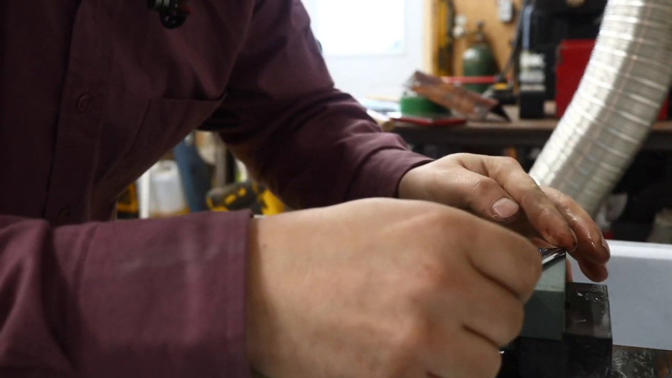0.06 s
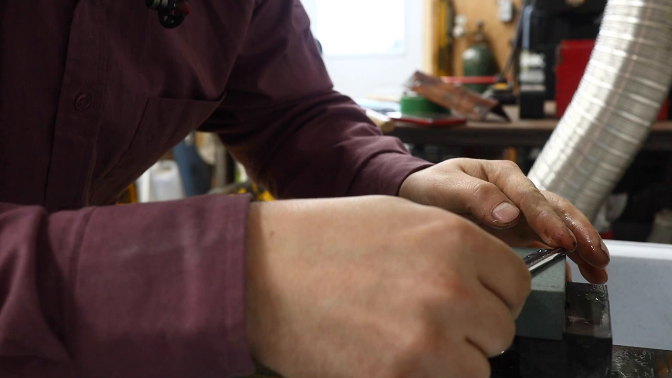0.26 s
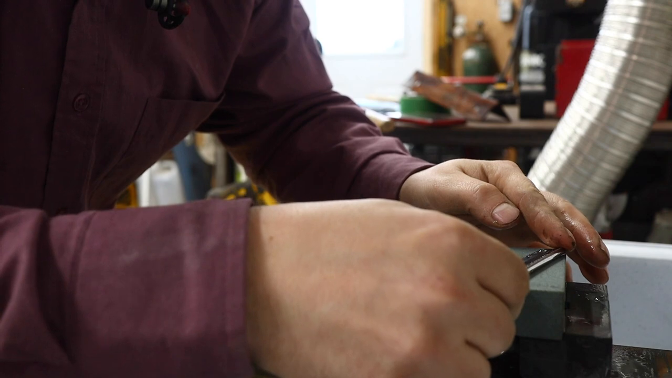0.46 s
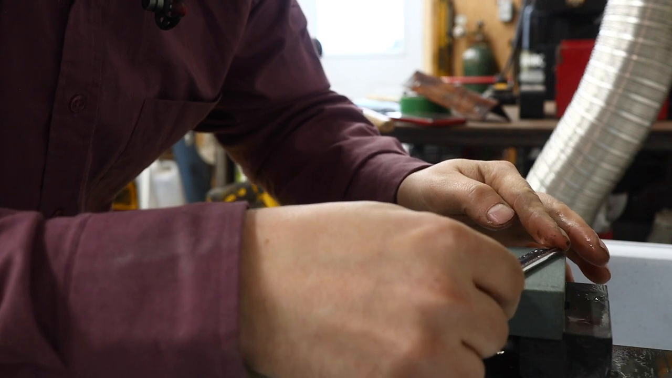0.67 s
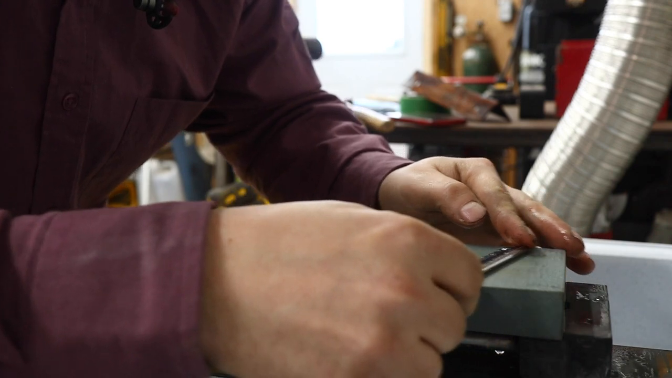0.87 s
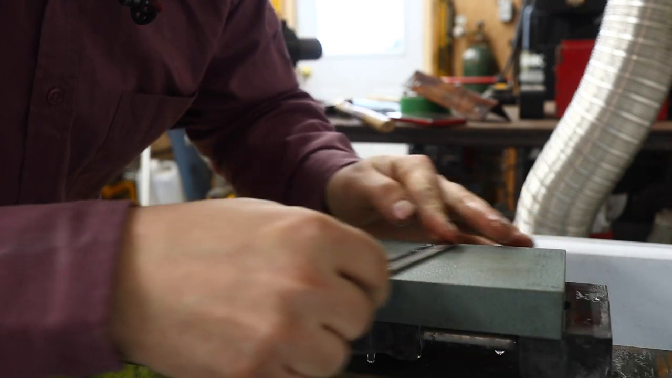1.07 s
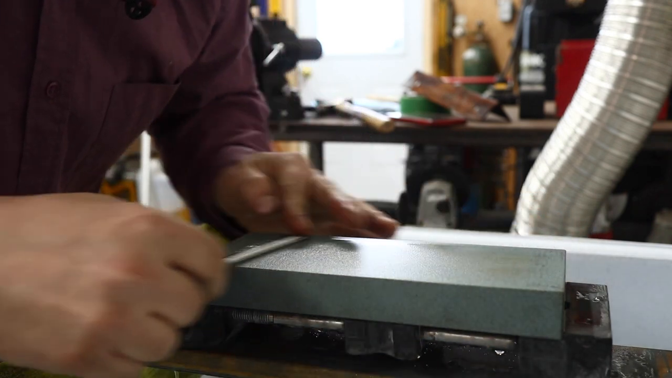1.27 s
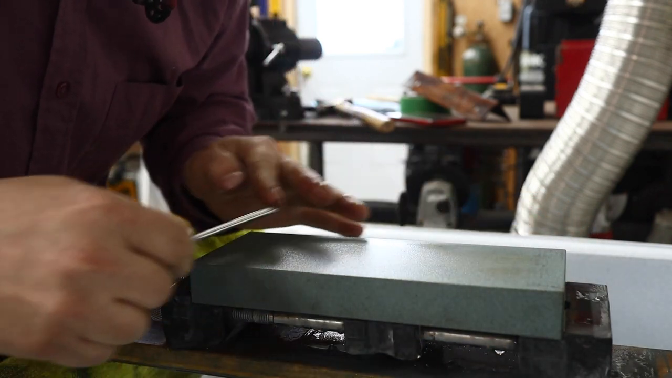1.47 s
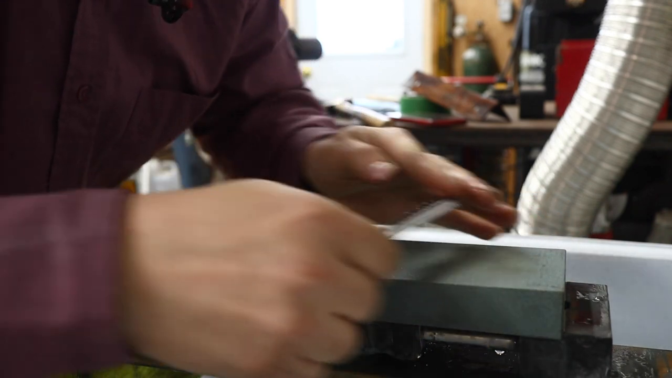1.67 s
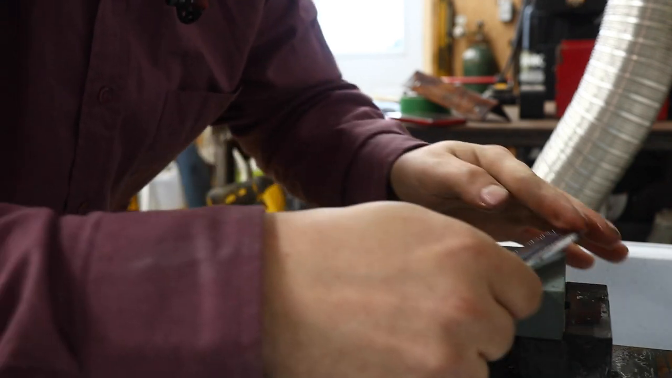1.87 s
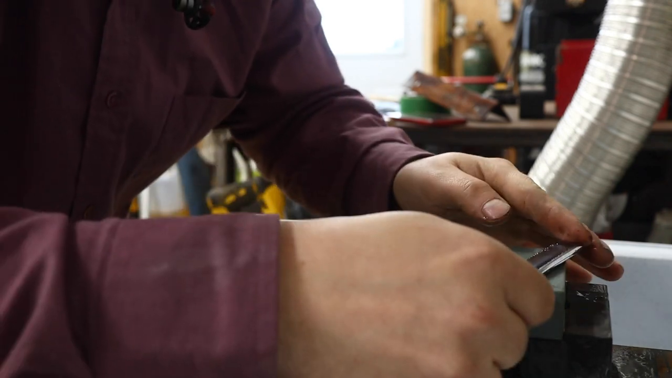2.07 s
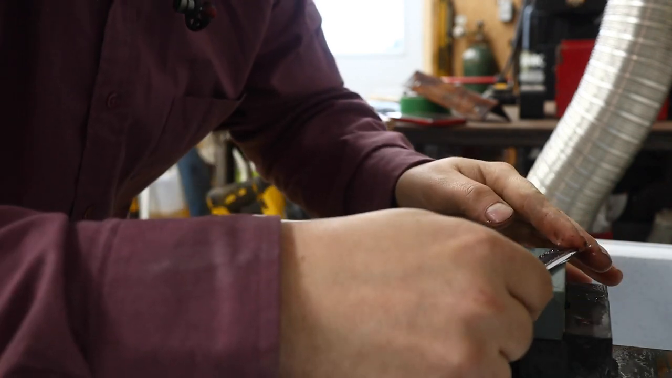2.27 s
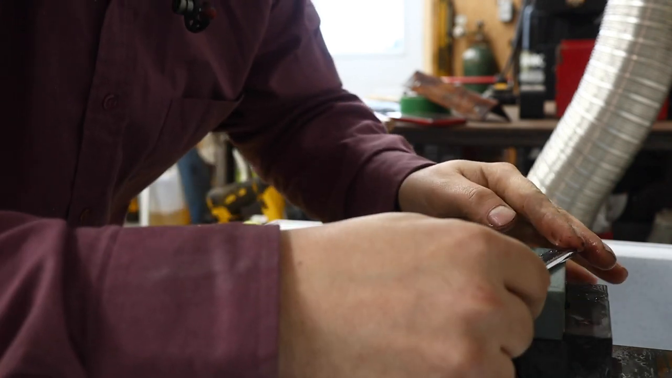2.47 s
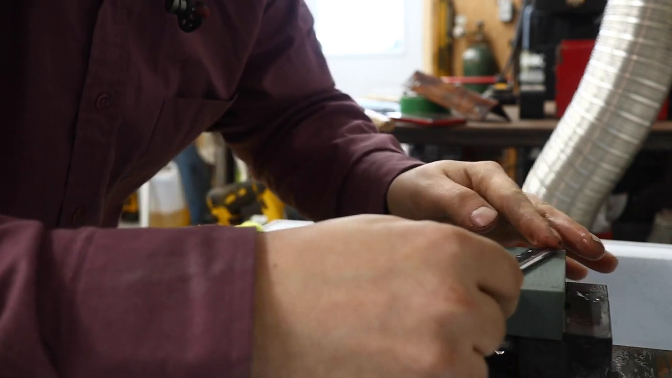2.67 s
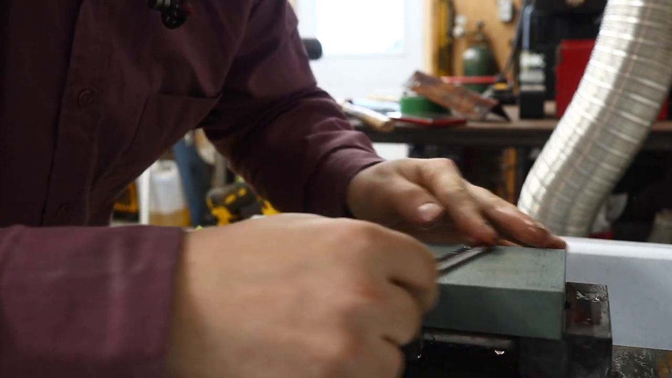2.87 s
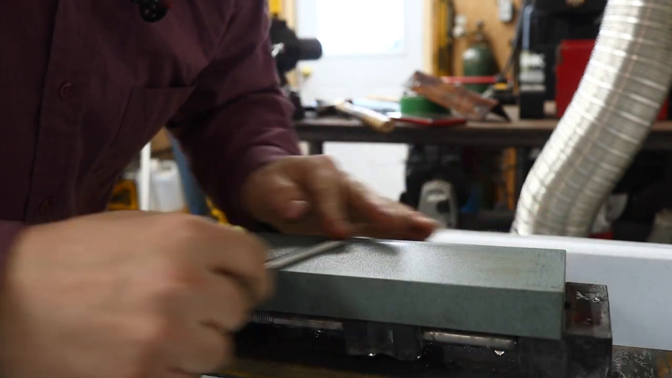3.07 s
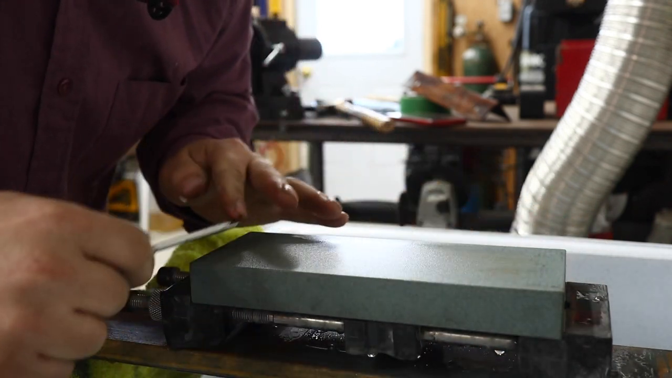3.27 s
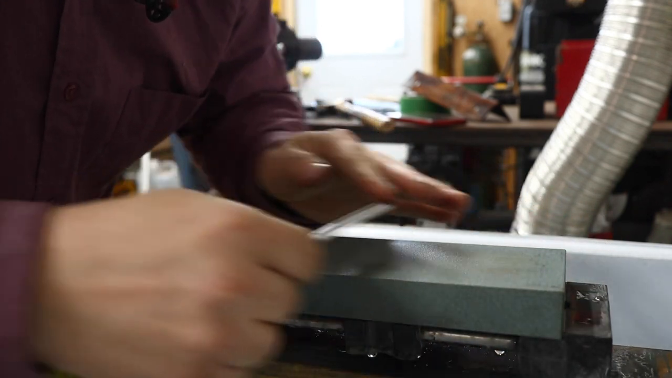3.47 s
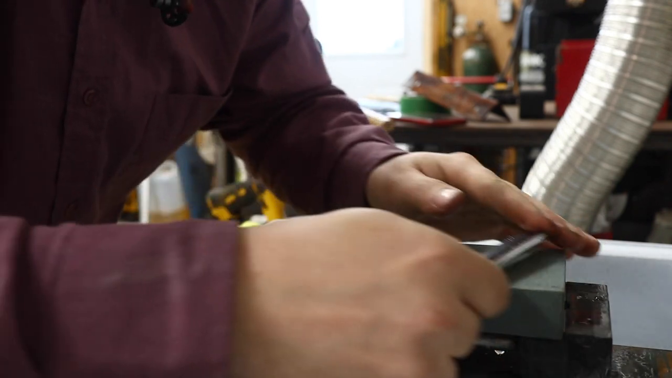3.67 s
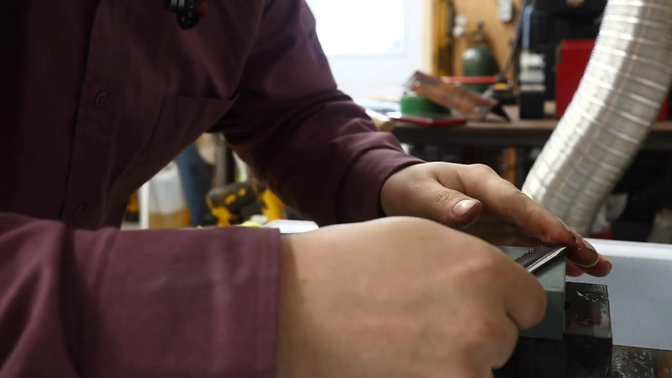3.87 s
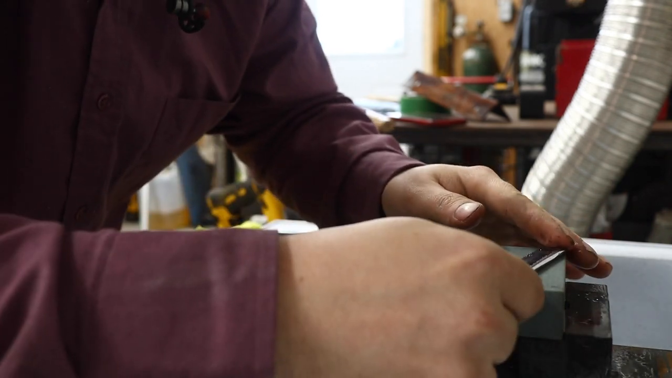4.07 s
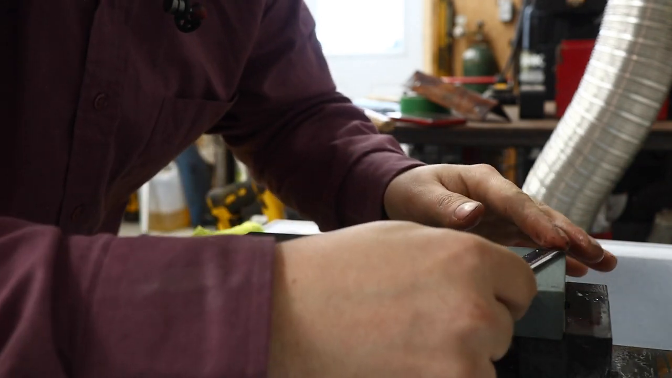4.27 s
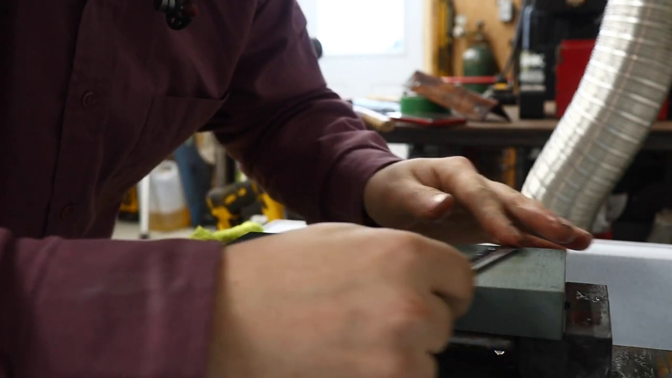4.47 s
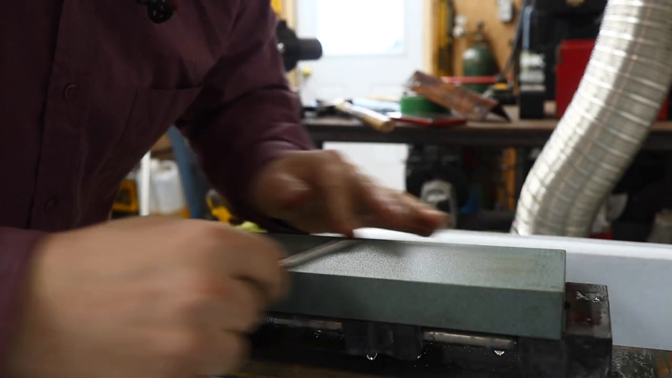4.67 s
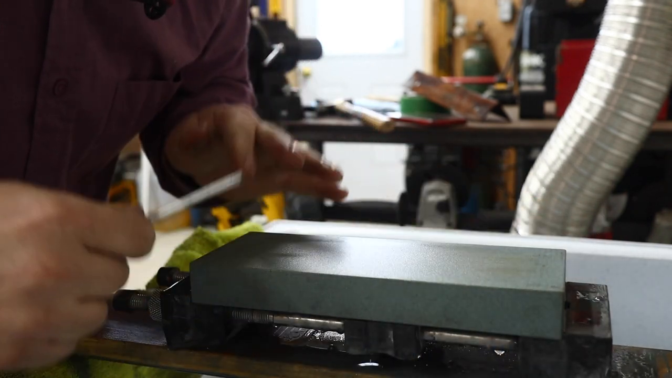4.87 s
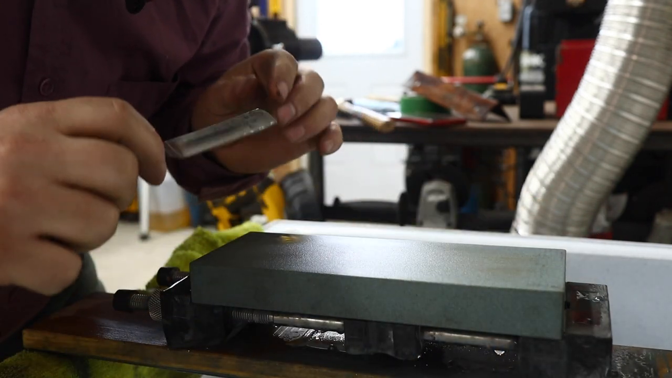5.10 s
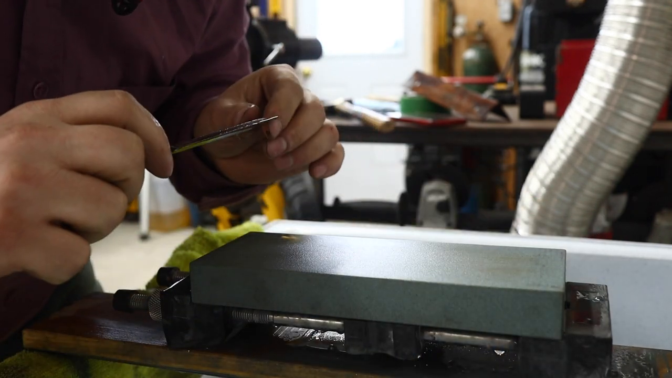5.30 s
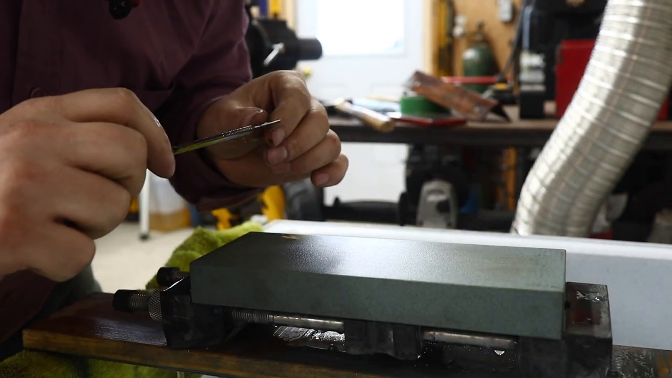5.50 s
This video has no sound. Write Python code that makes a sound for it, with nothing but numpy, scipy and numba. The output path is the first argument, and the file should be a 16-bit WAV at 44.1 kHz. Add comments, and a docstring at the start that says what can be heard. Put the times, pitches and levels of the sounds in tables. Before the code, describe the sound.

In a small, lightly reverberant workshop, a blade taps a sharpening stone and is drawn along it in three strokes. Each begins slow and grainy with tiny cracks, accelerates to a dense steely scrape with short zings, and lifts off cleanly. Dull finger knocks and light scuffs fill the pauses over faint fan air. The microphone is close, with wide stereo and movement across the stone.

```python
"""Straight razor on a whetstone

Three strokes: a blade lands with a clack, settles with gritty ticks, then is drawn slowly and fast along a
coarse stone, close up in a small workshop. Random grains excite blade and stone resonances; noise and short
bursts shake the bench through low resonances. Handle knocks are filtered bursts, the fan is wavering tones
over air noise, and decaying noise tails supply the near reflections and the room.
"""
import sys
import numpy as np
from scipy import signal
from scipy.fft import rfft, irfft
from scipy.io import wavfile
from scipy.ndimage import map_coordinates
from numba import njit

SR = 44100
rng = np.random.default_rng(int(sys.argv[2]) if len(sys.argv) > 2 else 0)


def transcribe(signal):
    """Save signal, clipped to [-1, 1], as a 16-bit WAV file at the path in sys.argv[1]."""
    frames = np.atleast_2d(signal).T
    limited = np.clip(frames, -1, 1)
    pcm = np.round(limited * 32767).astype(np.int16)
    wavfile.write(sys.argv[1], SR, pcm)


N = 244314
TIME = np.arange(N) / SR

# Event levels are drive levels: each layer adds its own trim on top.
# strokes: blade starts [t/s], fastest [t/s], starts to leave [t/s], time to bear down [t/s],
# fast pull from peak to 1/e [t/s], slow creep re peak [level/dB], first bite re rasp [level/dB],
# rasp [level/dB], edge hiss [level/dB], blade resonance in the fast pull before tip rise and wander [f/Hz]
STROKES = [(0.738, 1.23, 1.443, 0.01, .2, -16, -20, -18.8, -26.6, 2520),
           (2.59, 3.125, 3.305, 0.013, .16, -17.5, -16, -17.7, -25.5, 2830),
           (4.33, 4.755, 4.89, 0.029, .142, -18.5, -24, -15.8, -22.7, 2900)]
# how hard the resting, then dragging blade shakes the bench, one list per stroke: [t/s, level/dB]
BENCH_LOADS = [
    [(0.64, -50), (0.68, -32.5), (0.91, -26.5), (0.945, -25.5), (1.11, -24), (1.28, -27), (1.33, -32.5),
     (1.385, -28.5), (1.45, -38)],
    [(2.09, -42), (2.20, -53), (2.56, -47.5), (2.60, -23), (2.655, -24.5), (2.70, -29.5), (2.92, -26.5),
     (3.14, -29), (3.255, -31), (3.29, -66)],
    [(3.92, -39), (4.11, -66), (4.32, -37.5), (4.39, -26.5), (4.50, -30.5), (4.545, -25.5), (4.64, -25.5),
     (4.70, -34.5), (4.865, -29), (4.90, -44)],
]
# the edge chatters on one blade mode: centre [t/s], centre to 1/e [t/s], pitch [f/Hz], [level/dB]
CHATTER = [(1.08, 0.06, 6450, -35), (1.207, 0.038, 2300, -29.5), (1.233, 0.066, 4470, -21),
           (1.312, 0.02, 3180, -33), (1.391, 0.033, 4600, -29.5), (3.042, 0.04, 2440, -26),
           (3.128, 0.018, 3070, -20), (4.676, 0.031, 2600, -25), (4.817, 0.033, 7300, -31.5)]
# the blade lands on the stone: [t/s], then clack, treble, bench thump, bench rocking,
# blade body and free ring [level/dB each]
TAPS = [(0.0149, -30, -43, -28, -49.5, -28.5, -25), (0.641, -29, -42, -41, -37, -21.5, -61),
        (2.075, -29.5, -40, -32, -48.5, -32.5, -77), (2.585, -33, -39, -66, -54, -34.5, -38.5),
        (3.906, -22.5, -35.5, -36, -43.5, -25, -70), (4.327, -34, -43, -41, -38.5, -32.5, -44)]
# the edge catches large grains: [t/s], edge crack [level/dB], blade ring [level/dB]
TICKS = [(0.389, -26, -28.5), (0.6935, -45, -19), (0.7042, -45, -21.5), (0.773, -48, -17),
         (0.837, -28, -39), (0.989, -24, -53), (1.089, -33, -7), (1.118, -37, -21), (2.261, -40, -36),
         (2.3067, -40, -28), (2.409, -25.5, -31), (2.426, -27.5, -31.5), (2.664, -26, -20),
         (2.756, -40, -14.5), (2.802, -17.5, -26), (2.885, -47, -13), (2.985, -41, -5.5), (3.153, -15, -6),
         (3.297, -25, -47), (4.235, -32, -30), (4.2483, -33, -27.5), (4.351, -32, -18), (4.508, -37, -13)]
# the handle turns in the fingers: [t/s], bump [level/dB], hollow tock [level/dB]
KNOCKS = [(0.333, -46.5, -65), (0.534, -42, -44), (1.616, -43.5, -33), (1.751, -68, -39.5),
          (2.236, -42.5, -53), (3.54, -41.5, -50), (4.009, -53, -31.5)]
# the edge is nudged flat with a short scuff: start [t/s], end [t/s], [level/dB]
NUDGES = [(0.32, 0.349, -52), (0.636, 0.71, -48.5), (2.224, 2.238, -46), (2.297, 2.34, -49),
          (4.125, 4.156, -53), (4.186, 4.214, -56), (4.212, 4.252, -49.5)]

# relative spectra, rescaled to unit power by colour(): [f/Hz, level/dB]
RASP_SPECTRUM = [(300, -19), (700, -35), (1250, -21.5), (1600, -7), (2000, -2), (3000, 2.5), (3700, -1.5),
                 (4400, -5), (5800, -7.5), (8500, -8), (15000, -28.5)]
EDGE_SPECTRUM = [(1500, 0.5), (4000, -26), (6000, 5.5), (8000, 1.5), (9400, 2), (10700, 6), (12000, 3.5),
                 (14000, -9), (16000, -37)]
STONE_SPECTRUM = [(100, -30), (250, 5), (430, 1), (600, -8), (780, -10), (950, -2), (1250, -9.5), (1550, 1),
                  (2200, -19.5), (4000, -41)]
BENCH_SPECTRUM = [(20, -51), (45, -16), (70, -9), (120, -5), (190, -4.5), (240, -11), (350, -28),
                  (600, -24), (1500, -83)]
BITE_SPECTRUM = [(500, -8), (2200, -5.5), (3200, 5), (4700, 1.5), (5600, -17), (9400, -6), (10800, -6.5),
                 (15000, -48)]
TAP_SPECTRUM = [(100, -25), (600, -10.5), (1000, -3.5), (1400, 1.5), (2400, -3.5), (3300, -3.5),
                (4500, -10), (6500, -47), (9000, -6), (15000, -56)]
TAP_BODY_SPECTRUM = [(500, -9), (2000, -26), (2550, 2), (3500, -2.5), (4100, -6), (7000, -27), (13000, -44)]
TOCK_SPECTRUM = [(200, -13), (600, -7), (880, -4.5), (1400, -7), (3300, -35), (8000, -42)]
KNOCK_SPECTRUM = [(40, -26), (130, 6), (400, 0), (700, -11.5), (1000, -11), (2000, -19), (5000, -64)]
ROCK_SPECTRUM = [(25, -41), (55, 23), (75, 18.5), (120, 10.5), (300, -9), (1000, -64)]
AIR_SPECTRUM = [(15, -70), (25, -7.5), (193, -8.5), (209, 1.5), (313, -5.5), (445, -3.5), (582, -8),
                (1200, -11.5), (1950, -13.5), (4040, -21.5), (12500, -36.5), (15500, -64)]
# resonances on those spectra: centre [f/Hz], width [f/Hz], lift [level/dB]
BLADE_MODES = [(2830, 220, 3), (3260, 160, 2), (4160, 200, 2), (4600, 400, 3), (6750, 200, 2),
               (10800, 600, 3)]
STONE_MODES = [(260.5, 18, 9.1), (314, 50, 4.5), (415.6, 27, 6.7), (1085, 28, 9.4)]
CLACK_MODES = [(920, 100, 7.3), (3370, 200, 14.7), (4860, 160, 6.9)]
BENCH_MODES = [(86, 34, 9.4), (146.1, 31.5, 13.9), (183.4, 26, 9.9)]
# the blade's free ring after a landing: [f/Hz], [level/dB], 60 dB decay [t/s]
FREE_RING = [(4540, -2, 0.025), (5750, 8.5, 0.011), (5920, 3, 0.027), (6530, -25, 0.21), (6350, -9, 0.052),
             (7000, -9, 0.06)]
# fan tones before the core and skirt trims: [f/Hz, level/dB]
FAN_TONES = [(220.7, -62), (269.2, -62), (312.2, -58.5), (1168, -64), (1690, -62), (1873, -67)]
# stereo width, as gain on the side channel: [f/Hz, level/dB]
SIDE_GAIN = [(60, -42), (140, -20.5), (250, -10.5), (500, -2), (1000, -0.5), (2200, 3), (4500, 5.5),
             (8000, 7.5), (12000, 10.5)]

AIR_DB = -50
BOUNCE_S, BOUNCE_DB = 0.008, -19  # the landing blade touches a second time
ROOM_DB, ROOM_T60_S, ROOM_TREBLE_T60_S, ROOM_SPLIT_HZ = -13, 0.52, 0.33, 6100
NUDGE_GRAINS_PER_S, NUDGE_BLADE_DB, NUDGE_UNEVEN_DB = 2000, 3, 6.5
EASE_S, LEAVE_S = 0.068, 0.016  # the hand eases off before the edge has left the stone
PULL_SQUARENESS = 2.6  # above 2, the fast pull sets in more suddenly and holds its speed
SURGE_DB, SURGE_PER_S = 1.0, 22  # the creeping blade catches and slips
BITE_S = 0.11  # the edge first digs in with a bright crunch, then settles
HISS_SPEED_POWER, HISS_TIP_DB = 0.94, 6  # edge hiss grows with speed and toward the tip
# the blade resonance rises toward the tip and wanders as the edge rocks
RING_SLOW_HZ, RING_TIP_HZ, RING_WANDER_HZ = 2810, 200, 25.8
RING_WIDTH_HZ, RING_BLUR_HZ = 210, 560  # resonator width at rest, and the extra at full speed
FLEX_HZ, FLEX_WANDER_HZ, FLEX_DB = 4250, 280, -12.5  # upper resonance of the thin edge
# base grain rate at a standstill, and the extra at full speed
GRAINS_SLOW_PER_S, GRAINS_FAST_PER_S = 1200, 40000
TOP_HZ = 15900


def undb(db):
    """Decibels to gain."""
    return 10 ** (np.asarray(db) / 20)


def unit(x):
    """Scale to rms 1."""
    return x / np.sqrt(np.mean(x ** 2))


def spectrum_db(hz, points):
    """Join (Hz, dB) points on a log-frequency axis."""
    at, db = np.transpose(points)
    return np.interp(np.log(hz + 1), np.log(at), db)


def colour(x, points, modes=(), size=8192):
    """Causal filter of unit power gain: a smooth spectrum lifted at resonances."""
    hz = np.fft.rfftfreq(size, 1 / SR)
    lifts = sum(lift / (1 + (2 * (hz - f) / width) ** 2) for f, width, lift in modes)
    db = spectrum_db(hz, points) + lifts
    # folding the cepstrum forward in time gives minimum phase, so onsets stay sharp
    cepstrum = irfft(np.log(undb(db)))
    cepstrum[1:size // 2] *= 2
    cepstrum[size // 2 + 1:] = 0
    response = irfft(np.exp(rfft(cepstrum)))
    return signal.fftconvolve(x, response / np.linalg.norm(response))[:N]


@njit
def resonate(x, hz, width):
    """State-variable band-pass whose centre and width move."""
    y, band, low = np.empty(len(x)), 0., 0.
    for i in range(len(x)):
        g, k = np.tan(np.pi * hz[i] / SR), width[i] / hz[i]
        v = (band + g * (x[i] - low)) / (1 + g * (g + k))
        band, low, y[i] = 2 * v - band, low + 2 * g * v, k * v
    return y


def resonate_twice(x, hz, width):
    """Two equal resonators in a row, for steeper skirts, scaled to rms 1."""
    return unit(resonate(resonate(x, hz, width), hz, width))


def walk(rate):
    """Smooth chance that changes about rate times a second; spread near 1."""
    steps = rng.standard_normal(4096)
    return map_coordinates(steps, [TIME * rate], order=2, mode="wrap")


def narrow(hz, width):
    """A wavering tone of rms 1: noise through a narrow resonator."""
    return unit(resonate(rng.standard_normal(N), np.full(N, float(hz)), np.full(N, float(width))))


def grit(rate, spread_db):
    """Grains break at rate a second, at most one a sample, most small and a few large."""
    size = undb(spread_db * np.minimum(rng.exponential(size=N), 5))
    hit = rng.random(N) < rate / SR
    sign = rng.choice([-1, 1], N)
    return unit(hit * size * sign / np.sqrt(rate))


def bursts(times, db, fade_s):
    """A short crush of random-sign pulses at each time, dying away."""
    envelope = np.zeros(N)
    for s, gain in zip(times, undb(db)):
        start = max(int(s * SR), 0)
        envelope[start:] += gain * np.exp(-TIME[:N - start] / fade_s)
    return envelope * rng.choice([-1, 1], N)


def ramp(seconds, length_s):
    """Rise from 0 to 1 over length_s once seconds turns positive."""
    return np.clip(seconds / length_s, 0, 1)


def echoes(x, delay_s, t60_s):
    """Diffuse reflections of unit energy: a decaying noise tail each for mid and side."""
    t = TIME[:SR]
    tail = rng.standard_normal((2, SR)) * np.exp(-np.log(1000) * t / t60_s) * (t > delay_s)
    tail /= np.linalg.norm(tail, axis=1, keepdims=True)
    return signal.fftconvolve(x[None], tail, axes=1)[:, :N]


def workshop():
    """Gently drifting air noise and the wavering tones of a fan, as mid and side."""
    def one_channel():
        air = undb(AIR_DB) * colour(rng.standard_normal(N), AIR_SPECTRUM) * undb(0.5 * walk(2.04))
        # each tone has a core of even level and wandering phase in a narrow skirt of turbulence
        cores = sum(undb(db) * np.sin(2 * np.pi * hz * TIME + 2.1 * walk(9.2)) for hz, db in FAN_TONES)
        skirts = sum(undb(db) * narrow(hz, width=16.0) for hz, db in FAN_TONES)
        return air + undb(1.5) * cores + undb(-3.5) * skirts
    return np.array([one_channel(), one_channel()])


def taps():
    """Steel lands on stone with a clack, bounces once, skids a little, and the blade rings freely."""
    s, peak_db, treble_db, _, _, body_db, ring_db = np.transpose(TAPS)
    strike = bursts(s, peak_db, fade_s=0.0028)
    bounce = bursts(s + BOUNCE_S, peak_db + BOUNCE_DB, fade_s=0.0016)
    skid = undb(-8.5) * bursts(s, peak_db, fade_s=0.021)
    clack = colour(strike + bounce + skid, TAP_SPECTRUM, CLACK_MODES)
    treble = colour(bursts(s, treble_db, fade_s=0.012), EDGE_SPECTRUM, [(10100, 1300, 14.0)])
    body = colour(bursts(s, body_db, fade_s=0.0043), TAP_BODY_SPECTRUM)
    blows = np.zeros(N)
    blows[(s * SR).astype(int)] = undb(ring_db)
    ring = sum(undb(db - 60 * TIME / t60) * np.sin(2 * np.pi * hz * TIME) for hz, db, t60 in FREE_RING)
    return clack + treble + body + signal.fftconvolve(blows, ring)[:N]


def bench(rumble):
    """The drag and each landing shake the stone, its clamp and the bench, which rocks on for a moment."""
    s, _, _, thump_db, rock_db, *_ = np.transpose(TAPS)
    drag = undb(-1.5) * rumble * rng.standard_normal(N)
    thump = undb(1.0) * bursts(s, thump_db, fade_s=0.021)
    rocking = colour(bursts(s, rock_db, fade_s=0.29), ROCK_SPECTRUM)
    return colour(drag + thump, BENCH_SPECTRUM, BENCH_MODES) + rocking


def near_echoes(x, place, count=13):
    """Stone, hands and clamp reflect differently at each place, so the colour shifts along a stroke."""
    # such small surfaces only throw back short waves
    x = signal.sosfilt(signal.butter(1, 600, "high", fs=SR, output="sos"), x)
    out = 0
    for k in range(count):
        # crossfade between neighbouring reflection patterns at equal power
        share = np.clip(1 - np.abs(np.sqrt(place) * (count - 1) - k), 0, 1)
        out = out + echoes(x * np.sqrt(share), delay_s=0.00019, t60_s=0.029)
    return out


def walls(x):
    """The small room rings briefly, its treble dying first."""
    low = signal.sosfiltfilt(signal.butter(2, ROOM_SPLIT_HZ, fs=SR, output="sos"), x)
    low_tail = echoes(low, delay_s=0.0046, t60_s=ROOM_T60_S)
    treble_tail = echoes(x - low, delay_s=0.0089, t60_s=ROOM_TREBLE_T60_S)
    return undb(ROOM_DB) * (low_tail + treble_tail)


def nudges():
    """Fine grains scuff unevenly while the edge is laid flat."""
    gain = sum(undb(db) * ramp(TIME - start, 0.0071) * ramp(end - TIME, 0.021) for start, end, db in NUDGES)
    uneven = undb(NUDGE_UNEVEN_DB * walk(50))
    crumbs = gain * uneven * grit(NUDGE_GRAINS_PER_S, spread_db=4.5)
    blade = undb(NUDGE_BLADE_DB) * colour(crumbs, RASP_SPECTRUM, BLADE_MODES)
    return colour(crumbs, EDGE_SPECTRUM) + blade


def knocks():
    """The handle bumps dully against the fingers, at times with a short hollow tock."""
    s, bump_db, tock_db = np.transpose(KNOCKS)
    bump = bursts(s, bump_db, fade_s=0.061) + undb(6.0) * bursts(s, bump_db, fade_s=0.011)
    tock = bursts(s, tock_db, fade_s=0.0014)
    return colour(bump, KNOCK_SPECTRUM) + colour(tock, TOCK_SPECTRUM)


def ticks():
    """Single grains crack under the edge, which then slips over the crumbs."""
    s, edge_db, blade_db = np.transpose(TICKS)
    crumbs = grit(5000, spread_db=3)
    blade_hit = undb(-7.0) * bursts(s, blade_db, fade_s=0.0015)
    blade_slip = undb(-19.0) * crumbs * bursts(s, blade_db, fade_s=0.013)
    crack = undb(-4) * bursts(s, edge_db, fade_s=0.002)
    slip = undb(-22.5) * crumbs * bursts(s, edge_db, fade_s=0.022)
    blade = colour(blade_hit + blade_slip, RASP_SPECTRUM, BLADE_MODES)
    return blade + colour(crack + slip, EDGE_SPECTRUM, [(11500, 10000, 8.2)])


def hand():
    """Each stroke bites, creeps, swells into a fast pull and lifts; speed, pressure and place set the drive."""
    rasp, bite, edge, rumble, place = np.zeros((5, N))
    ring_hz = np.full(N, float(RING_SLOW_HZ))
    surge_db = SURGE_DB * walk(SURGE_PER_S)
    for stroke, load in zip(STROKES, BENCH_LOADS):
        start, fastest, lift, bear_s, pull_s, creep_db, bite_db, rasp_db, edge_db, fast_hz = stroke
        pull = np.exp(-np.abs((TIME - fastest) / pull_s) ** PULL_SQUARENESS)
        speed = pull + (1 - pull) * undb(creep_db + surge_db)
        left_s = lift + LEAVE_S - TIME
        contact = ramp(TIME - start, bear_s) * ramp(left_s, LEAVE_S)
        pressure = ramp(left_s, EASE_S)
        # place on the stone: 0 at the far end, 1 where the blade lifts; the contact reaches the tip last
        along = np.cumsum(speed * contact) / np.sum(speed * contact)
        tip = along ** 4
        rasp += contact * pressure * speed * undb(rasp_db)
        bite += contact * np.exp(-((TIME - start) / BITE_S) ** 2) * undb(rasp_db + bite_db)
        edge += contact * speed ** HISS_SPEED_POWER * undb(edge_db + HISS_TIP_DB * tip)
        rumble += undb(np.interp(TIME, *np.transpose(load), left=-np.inf, right=-np.inf))
        place = np.where(contact > 0, along, place)
        stroke_hz = RING_SLOW_HZ + (fast_hz - RING_SLOW_HZ) * pull + RING_TIP_HZ * tip
        ring_hz = np.where(TIME > start, stroke_hz, ring_hz)
    return rasp, bite, edge, rumble, place, ring_hz + RING_WANDER_HZ * walk(25)


def scrape(rasp, bite, edge, rumble, ring_hz):
    """The edge ploughs through grit: uneven clumps of grains when slow, a fine dense rasp when fast."""
    speed = rasp / rasp.max()  # the rasp level stands in for speed
    grain_rate = GRAINS_SLOW_PER_S + GRAINS_FAST_PER_S * speed ** 1.8
    clumps = undb((1 - 0.4 * speed) * (1.4 * walk(55) + 1.8 * walk(300)))
    grains = grit(grain_rate, spread_db=3.1) * clumps
    # the main blade resonance and its octave are narrow while creeping;
    # they blur and shift as the contact slides along the edge
    width = RING_WIDTH_HZ + RING_BLUR_HZ * speed
    push = grit(grain_rate, spread_db=1.5) / np.sqrt(width)
    ring = undb(-3.5 - 9 * speed ** 0.7) * resonate_twice(push, ring_hz, width)
    octave = undb(-13 - 16 * speed) * resonate_twice(push, 2 * ring_hz, width)
    # at speed a higher flexing of the edge joins in, sliding about as the blade rocks
    flex_hz = FLEX_HZ + FLEX_WANDER_HZ * walk(14)
    flex = undb(FLEX_DB) * speed * resonate_twice(grains, flex_hz, 2 * width)
    blade = undb(-3.5) * colour(grains, RASP_SPECTRUM, BLADE_MODES) + ring + octave + flex
    hiss = undb(-8.0) * colour(grit(3 * grain_rate, spread_db=3.0) * clumps, EDGE_SPECTRUM)
    crunch = colour(grit(3 * GRAINS_SLOW_PER_S, spread_db=2.5) * clumps, BITE_SPECTRUM)
    # the stone's own body answers more to pressure than to speed
    stone_grains = grit(grain_rate, spread_db=2.0) * clumps
    stone = undb(-9.5) * colour(stone_grains, STONE_SPECTRUM, STONE_MODES)
    stone_drive = rasp ** 0.25 * rumble ** 0.75
    return rasp * blade + bite * crunch + edge * hiss + stone_drive * stone


def chatter():
    """Brief half-pitched zings inside the rasp, where the edge chatters."""
    zings = np.zeros(N)
    for s, half_s, hz, db in CHATTER:
        zings += undb(db) * np.exp(-((TIME - s) / half_s) ** 2) * narrow(hz, width=600)
    return zings


def scene():
    """Blade, stone and bench with near reflections, the room and its fan, in wide stereo."""
    rasp, bite, edge, rumble, place, ring_hz = hand()
    landings = taps()
    rubbing = scrape(rasp, bite, edge, rumble, ring_hz) + chatter() + ticks() + nudges() + knocks()
    razor = landings + rubbing
    # from the right, sound reaches the right port earlier and louder; the blade ends just left of the axis
    offset = (1 - 1.1 * place) * (0.54 * signal.hilbert(razor).imag - 0.27 * razor)
    direct = undb(-0.5) * np.array([razor, offset])
    near = undb(-5.5) * near_echoes((rubbing + undb(-8.5) * landings) * undb(2 * place), place)
    shake = bench(rumble)
    mid, side = direct + near + walls(razor + shake) + workshop()
    side_gain = undb(spectrum_db(np.fft.rfftfreq(N, 1 / SR), SIDE_GAIN))
    side = irfft(rfft(side) * side_gain, N)
    # the direct bench shake stays in the middle
    return mid + shake + np.array([side, -side])


def record(dry):
    """A steep elliptic low-pass cuts the top of the treble."""
    return signal.sosfilt(signal.ellip(8, 0.2, 70, TOP_HZ, fs=SR, output="sos"), dry)


dry = scene()
out = record(dry)
transcribe(out)
```